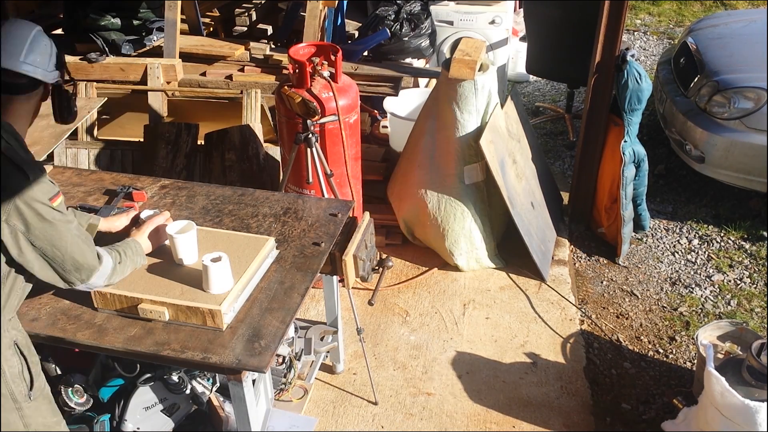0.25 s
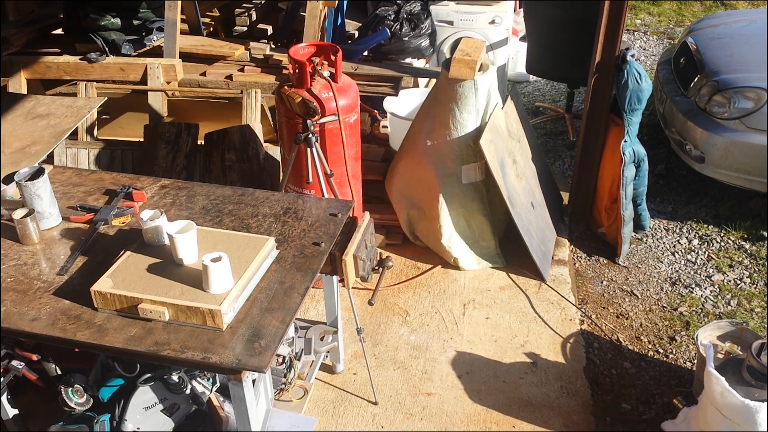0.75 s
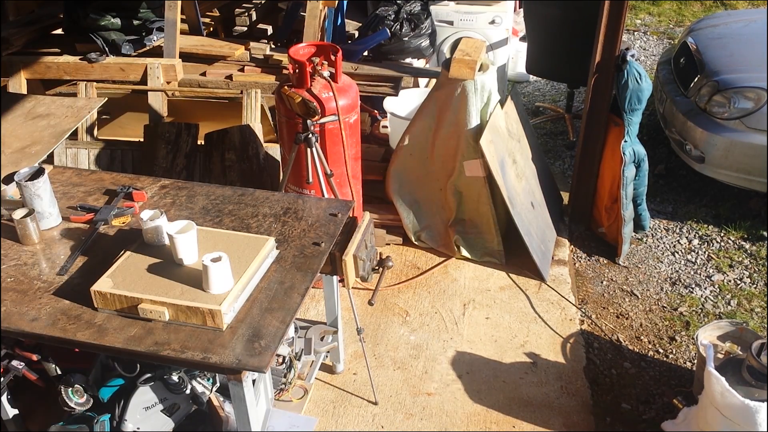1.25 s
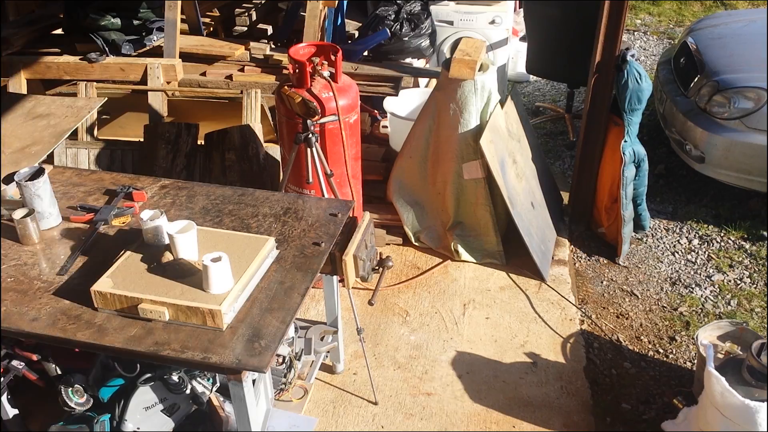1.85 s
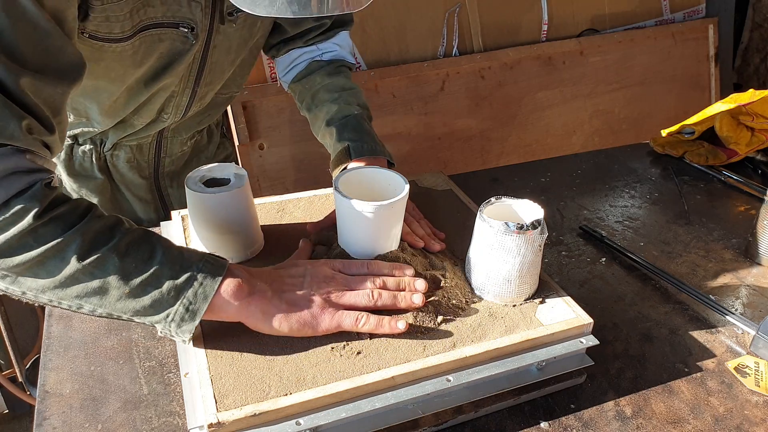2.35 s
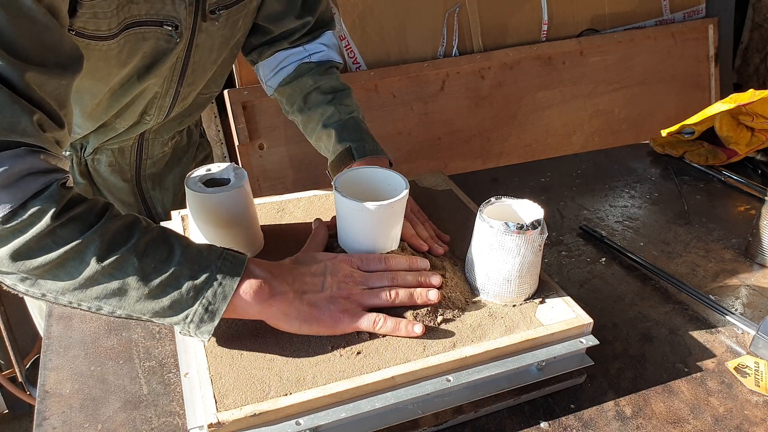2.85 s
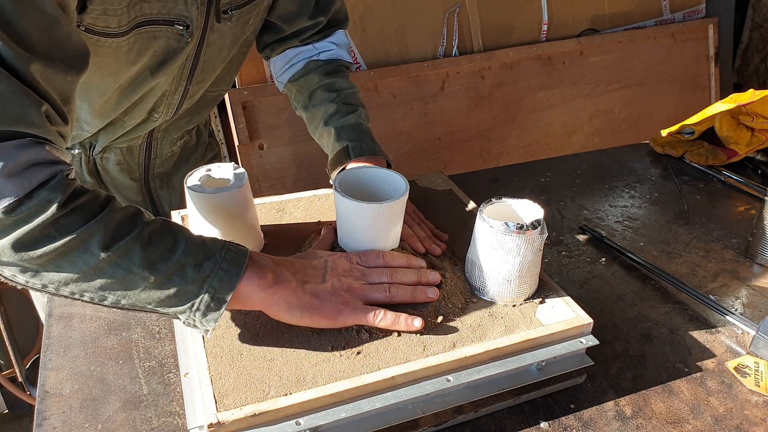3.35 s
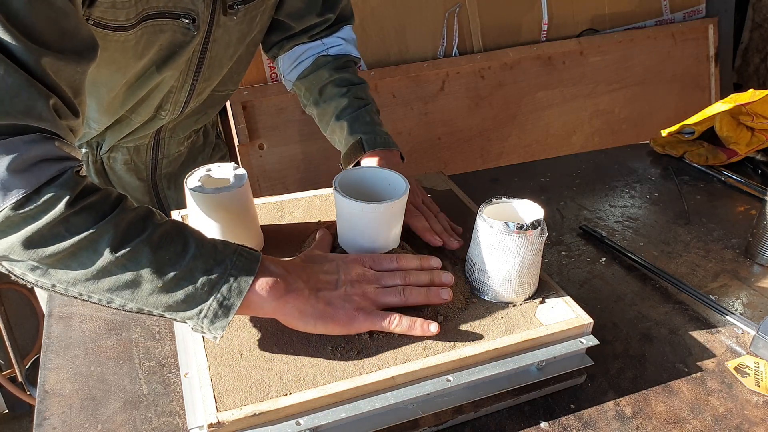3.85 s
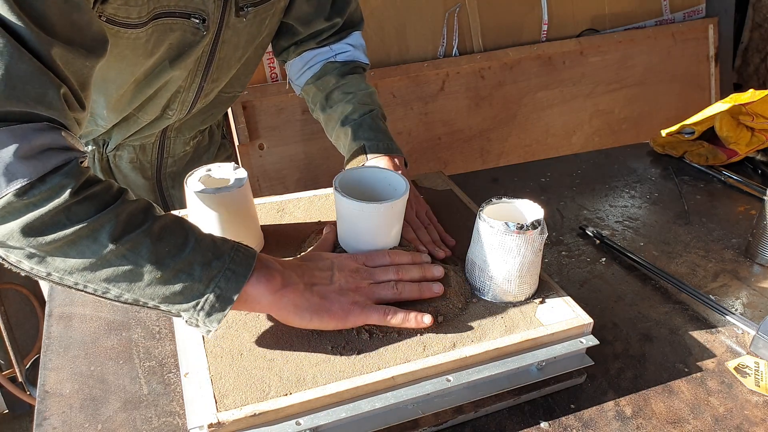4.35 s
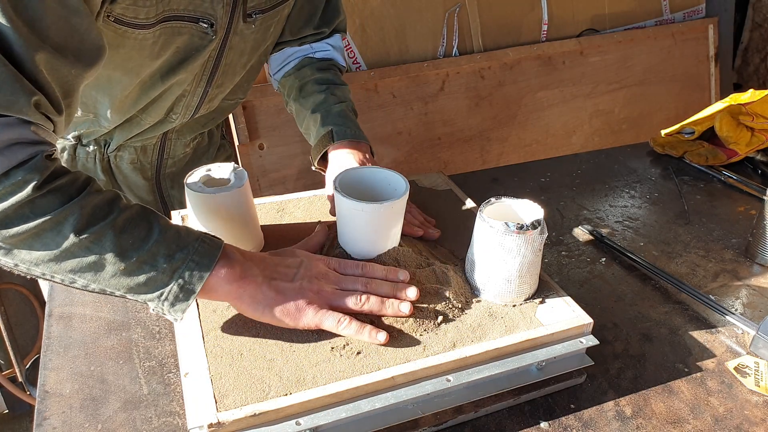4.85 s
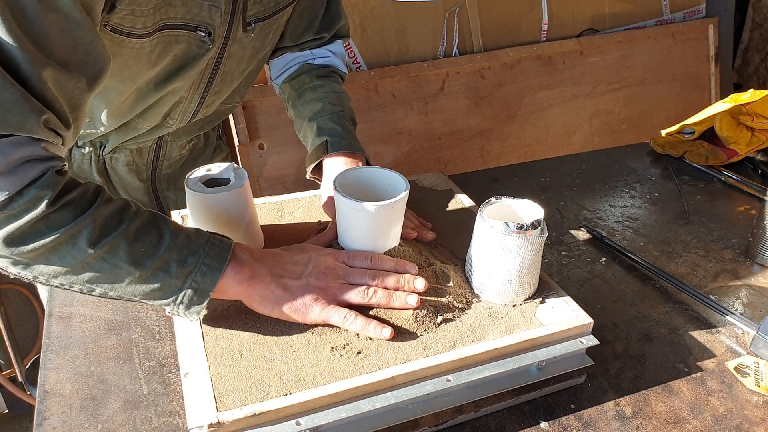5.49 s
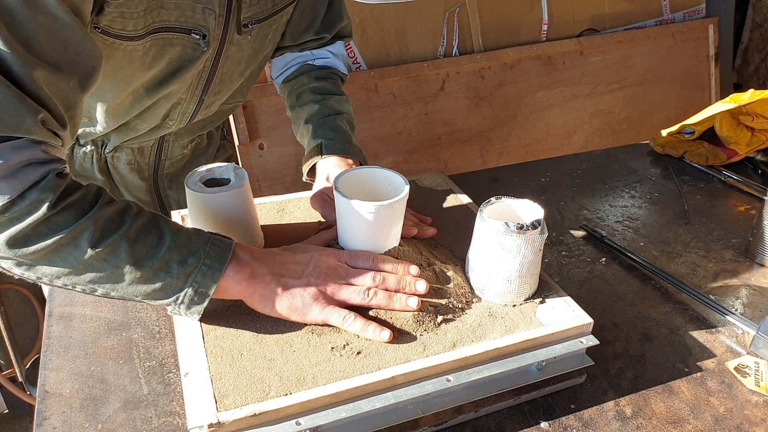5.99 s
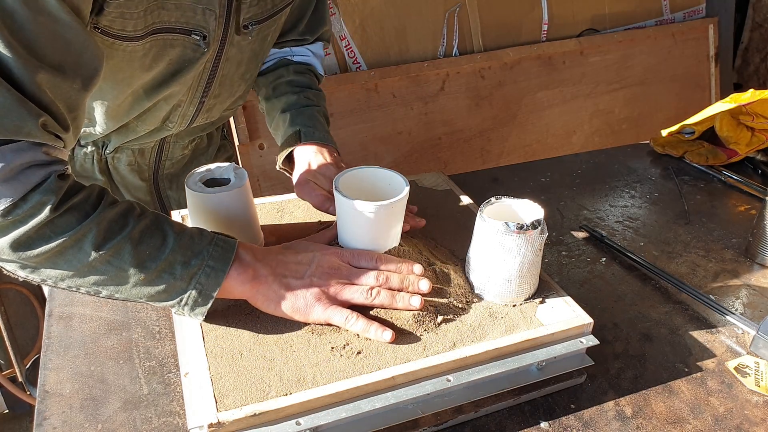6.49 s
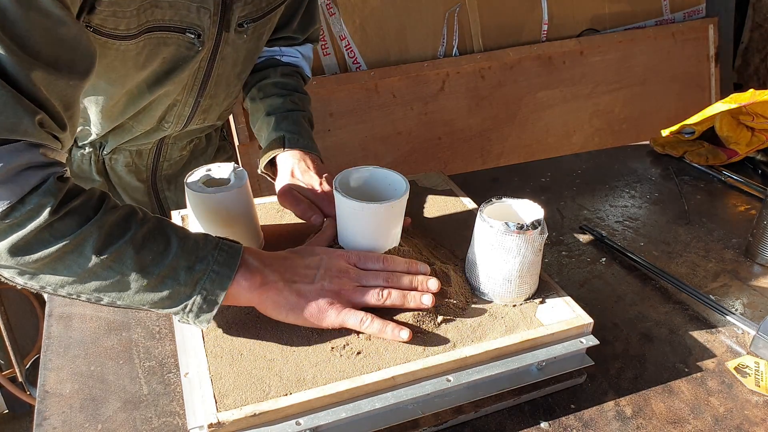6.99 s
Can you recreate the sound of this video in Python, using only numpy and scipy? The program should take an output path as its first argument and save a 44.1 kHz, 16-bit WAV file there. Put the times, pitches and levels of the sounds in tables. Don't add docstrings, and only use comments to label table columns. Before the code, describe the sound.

From 0 to 2.1 seconds, a gas furnace burner is heard from a distance in an outdoor workshop yard: a quiet, dull low rumble with a faint thin hiss toward the right, which flutters in quick little dips as if hurried and grainy. Over it hands shuffle sand in short, dry, gritty puffs: barely audible near 0.2 and 0.35, clearer in clusters around 0.5, 0.8, 1.1 and 1.8 seconds. At 2.14 a small click marks an instant jump to a close microphone. The burner is now far louder: a deep, turbulent, continuous roar with hollow cavity resonance and breathy mid hiss, fullest just after the change. A soft high gas hiss sits left, irregularly dimming and brightening, with noticeable dips near 4.2, 4.6 and 5.4 and brief lifts near 3.9 and 6.1. The roar sags only very slightly, continuing to about 7 seconds without a fade.

```python
import sys
import numpy as np
from scipy import signal
from scipy.fft import rfft, irfft
from scipy.io import wavfile
from scipy.ndimage import uniform_filter1d, map_coordinates

SR = 44100
rng = np.random.default_rng(int(sys.argv[2]) if len(sys.argv) > 2 else 0)


def undo_db(level):
    steps = np.asarray(level, float) / 20
    return 10 ** steps


def generate_wav(signal):
    frames = np.transpose(np.atleast_2d(signal))
    scaled = np.clip(frames, -1, 1) * 32767
    pcm = np.round(scaled).astype(np.int16)
    wavfile.write(sys.argv[1], SR, pcm)


N = 318843
HZ = np.fft.rfftfreq(N, 1 / SR) + .01
CUT_S = 2.1413

# (frequency [Hz], left density [dB per Hz], right density [dB per Hz])
FAR_SPECTRUM = [(25, -70, -73), (50, -68, -65.5), (92, -65.5, -64.5), (179, -60, -62), (286, -61.5, -63),
                (419, -70.5, -71), (764, -85, -81), (1155, -101.5, -99), (1700, -96.5, -93.5),
                (2480, -105, -99), (5360, -116, -99), (6600, -117, -97), (8500, -114, -99),
                (14800, -114, -107)]
# (frequency [Hz], left density [dB per Hz], right density [dB per Hz])
NEAR_SPECTRUM = [(25, -74, -86), (51, -53, -59), (97, -48.5, -51.5), (154, -46.5, -50.5),
                 (244.7, -54, -55.5), (431, -64, -67), (703, -72, -75.5), (1100, -86, -89.5),
                 (3380, -92, -93.5), (4640, -91, -91), (6100, -93.5, -97.5), (9000, -92.5, -101),
                 (11800, -87.5, -102), (15400, -92, -108)]
# (frequency [Hz], width [Hz], left boost [dB], right boost [dB])
FAR_RESONANCES = [(178, 31, 1.5, 7), (814, 81, 5.5, 3.5), (1543, 126, 9, 8), (2180, 200, 8, 4),
                  (7240, 1400, -78, 15), (9550, 1450, -20, 8.5)]
# (frequency [Hz], width [Hz], left boost [dB], right boost [dB])
CAVITY_MODES = [(105, 39, 0.57, 2.2), (132.6, 4.3, 1.4, 6.2), (171.2, 22.3, 3.7, 5.5), (215, 17.5, 4, 3.1),
                (274.7, 6.1, 6.1, 7.8), (309.3, 8.9, 9.4, 7.4), (386.6, 66, 5.4, 2.6), (438.4, 24, 4.1, 7),
                (635, 6, 3.8, 2.7), (746, 22, 6.3, 4.2), (883, 11, 6.6, 10)]
# (frequency [Hz], width [Hz], left boost [dB], right boost [dB])
TUBE_MODES = [(788, 40, 11, 14), (1515, 110, 9, 10), (1600, 100, 7, 8), (1830, 260, 7, 8),
              (2150, 260, 6, 8), (2780, 200, 4.5, 6), (3630, 400, 4, 4), (5500, 350, 4.5, 5),
              (6900, 500, 3, 1), (7480, 900, 12, 4), (11800, 2000, 2, 5)]
# (frequency [Hz], width [Hz], left dip [dB], right dip [dB])
REFLECTION_DIPS = [(193, 8, -7, -8), (250, 20, -3, -2), (300, 12, -5, -5), (340, 9, -6, -8),
                   (403, 9, -5, -7), (466, 8, -5, -10), (486, 7, -7, -4), (590, 9, -4, -6),
                   (624, 8, -5, -5), (670, 10, -6, -5), (744, 8, -8, -4), (868, 12, -4, -4),
                   (2000, 70, -4, -4), (3350, 90, -3, -3)]
# (frequency [Hz], coherence [0-1])
FAR_COHERENCE = [(30, 0), (120, 0.26), (400, 0.16), (15000, 0.22)]
# (frequency [Hz], coherence [0-1])
NEAR_COHERENCE = [(25, .4), (60, .78), (150, .99), (280, .9), (700, .86), (1150, .7), (1505, .87),
                  (1552, .45), (1600, .87), (2900, .55), (4600, .6), (7400, .55), (12000, .35), (15000, .2)]
ZONE_EDGES_HZ = [1150, 6200, 8400, 10300]
ARM_SHARE = [0.0, .4, .65, .8, .95]
PASSING_SHARE = [0.05, 0.17, 0.59, 1.7, 0.48]
# (start [s], length [s], change [dB])
ARM_SHADOWS = [(3.277, 0.077, -2), (3.92, 0.1, 6.5), (4.12, 0.39, -5.5), (4.566, .3, -9), (4.87, 0.1, -6),
               (5.08, 0.11, 2), (5.384, .17, -6.5), (5.55, 0.15, -3.5), (5.73, 0.23, -5), (6.06, 0.11, 5.5),
               (6.367, 0.28, -3.5), (6.77, .1, 2.5)]
# (start [s], length [s], change [dB])
PASSING_SHADOWS = [(0.0, 0.053, -6), (.155, .03, -11), (.205, .025, -8), (.25, 0.02, -5), (.375, 0.049, -7),
                   (.48, .1, -4), (.69, 0.036, -7), (.85, .025, -1), (.945, 0.023, -8), (1.015, .03, -7),
                   (1.34, .04, -3), (1.56, .04, -1), (1.84, 0.044, -9), (1.99, .04, -1)]
# (time [s], peak level [dB])
SAND_PRESSES = [(0.178, -57), (0.3494, -59), (0.484, -41), (0.5095, -36.5), (0.528, -46), (0.544, -43.5),
                (0.765, -44), (0.797, -43), (1.097, -41), (1.1174, -45), (1.772, -40.5), (1.796, -37.5),
                (1.8261, -43)]
# (frequency [Hz], left level [dB], right level [dB])
SAND_COLOUR = [(60, 33, 26), (200, 4, -1), (1000, 5, 11), (1490, 1, 5), (3500, -11, 2.5), (6000, -42, 5),
               (10000, -26, -0.5), (15000, -32, -20)]
# (delay [s], level [dB])
WALL_ECHOES = [(.0061, -21), (.0113, -17), (.0172, -17), (.0239, -17), (.0318, -17)]


def at_hz(rows):
    hz, *columns = np.transpose(rows)
    return np.array([np.interp(np.log(HZ), np.log(hz), column) for column in columns])


def flicker(rate_hz):
    knots = rng.standard_normal(400)
    return np.interp(np.arange(N) / SR * rate_hz, np.arange(400), knots) * np.sqrt(1.5)


def yard(x):
    from_hz, dull_hz = 1000, 5000
    delay_s, level_db = np.transpose(WALL_ECHOES)
    reflectance = 1 / (1 + (from_hz / HZ) ** 4) / np.sqrt(1 + (HZ / dull_hz) ** 2)
    gains = undo_db(level_db)[:, None] * reflectance
    phases = np.exp(-2j * np.pi * HZ * delay_s[:, None])
    walls = 1 + np.sum(gains * phases, axis=0)
    mean_gain = np.sqrt(1 + np.sum(gains ** 2, axis=0))
    return irfft(rfft(x) * walls / mean_gain, N)


def sand_shuffles():
    puff_s, press_shortens = 0.012, 0.029
    t = np.arange(N) / SR
    envelope = np.zeros(N)
    for start_s, peak_db in SAND_PRESSES:
        decay_s = puff_s * np.exp(-press_shortens * (peak_db + 44))
        age = np.clip(t - start_s, 0, 1) / decay_s
        envelope += undo_db(peak_db) * np.minimum(age * 6, 1) * np.exp(-age)
    hits = rng.random(N) < 9000 / SR
    grains = hits * undo_db(2.5 * np.minimum(rng.exponential(1, N), 3))
    noise = envelope * grains * rng.standard_normal((2, N))
    return irfft(rfft(noise) * undo_db(at_hz(SAND_COLOUR)), N)


def shadows(moves, edge_s):
    t = np.arange(N) / SR
    held_db = sum(change_db * ((t >= s) & (t < s + length_s)) for s, length_s, change_db in moves)
    return uniform_filter1d(held_db, int(edge_s * SR), mode="nearest")


def near_swells():
    swing_s, body_s = 0.082, 0.52
    surge_db, sag_db_per_s = 0.06, 0.24
    settle_db, settle_s = 2.2, .6
    t = np.arange(N) / SR
    near = t > CUT_S
    arms_db = shadows(ARM_SHADOWS, swing_s) + .6 * flicker(16.0)
    arms_db = arms_db - arms_db[near].mean()
    body_db = uniform_filter1d(arms_db, int(body_s * SR), mode="nearest")
    swells = np.array(ARM_SHARE)[:, None] * [body_db, body_db, arms_db, arms_db, arms_db]
    swells[0] += surge_db * flicker(4.07) - sag_db_per_s * (t - t[near].mean())
    swells[1] += settle_db * np.exp(-np.abs(t - CUT_S) / settle_s)
    for zone in swells[2:]:
        zone += 1.0 * flicker(9.0)
    return swells


def burner(spectrum, coherence, resonances, swells, ear_share, lag_s, repeat, flicker_db, trim_db):
    level_db = at_hz(spectrum)
    for hz, width_hz, *boost_db in resonances:
        level_db = level_db + np.outer(boost_db, 1 / (1 + (2 * (HZ - hz) / width_hz) ** 2))
    left, own = rfft(rng.standard_normal((2, N)))
    alike = np.clip(at_hz(coherence)[0], 0, 1)
    lagged = left * np.exp(-2j * np.pi * HZ * lag_s)
    right = alike * lagged + np.sqrt(1 - alike ** 2) * own
    ears = np.array([left, right]) * undo_db(level_db + trim_db) * np.sqrt(SR / 2)

    grain_s = 2048 / 48000
    ears = ears * np.sqrt(1 - repeat ** 2) / (1 - repeat * np.exp(-2j * np.pi * HZ * grain_s))

    below = [0] + [1 / (1 + (HZ / edge_hz) ** 16) for edge_hz in ZONE_EDGES_HZ] + [1]
    out = 0
    for k, swell_db in enumerate(swells):
        waver_db = flicker_db[k] * (flicker(11) + flicker(30))
        gain = undo_db((swell_db + waver_db) * np.array(ear_share)[:, [k]])
        out = out + gain * irfft(ears * (below[k + 1] - below[k]), N)
    return out


def far_view():
    swells = np.outer(PASSING_SHARE, shadows(PASSING_SHADOWS, .015) + 1.5)
    roar = burner(FAR_SPECTRUM, FAR_COHERENCE, FAR_RESONANCES, swells,
                  ear_share=[[1.0, 0.64, .2, .1, .3], [1.0, 1.0, 0.57, 0.39, 1.0]],
                  lag_s=0.000574, repeat=0.51, flicker_db=[0.085, 0.84, 1.1, 3.8, 0.93], trim_db=-0.5)
    return roar + undo_db(-1) * sand_shuffles()


def near_view():
    modes = [*CAVITY_MODES, *REFLECTION_DIPS, *TUBE_MODES]
    near = burner(NEAR_SPECTRUM, NEAR_COHERENCE, modes, near_swells(),
                  ear_share=[[1.0, 0.9, 1.0, 0.8, 0.98], [1.0, 0.81, 0.49, 0.2, .05]],
                  lag_s=0.000326, repeat=0, flicker_db=[0.54, 0.45, 0.86, 1.5, 0.58], trim_db=0.69)
    path = np.arange(N) + 0.52 * flicker(2.32)
    near[1] = map_coordinates(near[1], [path], order=3, mode="nearest")
    return yard(near)


def scene():
    far, near = far_view(), near_view()
    since_cut = np.arange(N) / SR - CUT_S
    first = near[:, [int(CUT_S * SR) + 1]]
    step = first + undo_db(-28.5)
    near = near - step * np.exp(-(since_cut / 0.0017) ** 2)
    return np.where(since_cut < 0, far, near)


def band_limit(x):
    return signal.sosfilt(signal.butter(12, 16530, fs=SR, output="sos"), x)


def record(dry):
    mix = irfft(rfft(dry) * (HZ < 15720), N)
    return band_limit(mix)


dry = scene()
out = record(dry)
generate_wav(out)
```